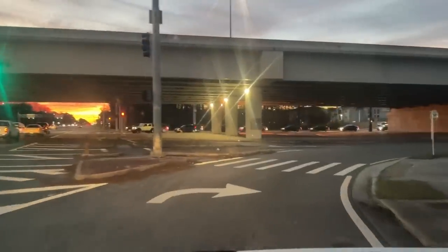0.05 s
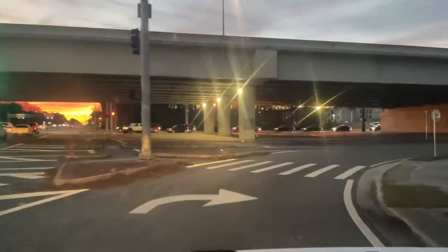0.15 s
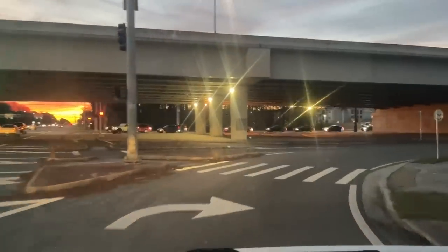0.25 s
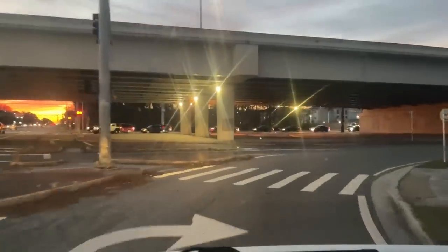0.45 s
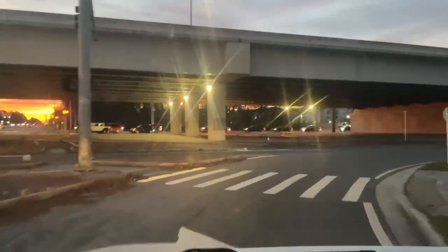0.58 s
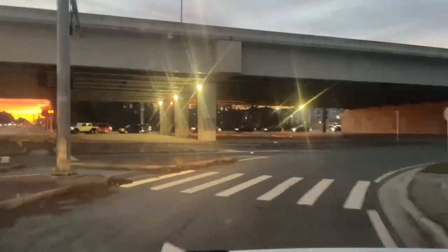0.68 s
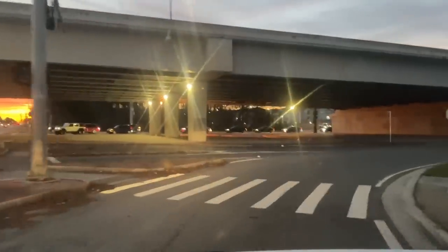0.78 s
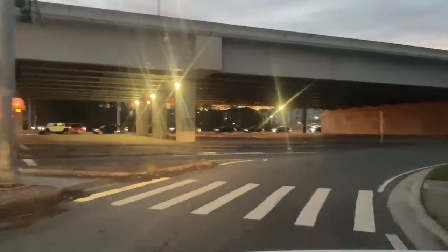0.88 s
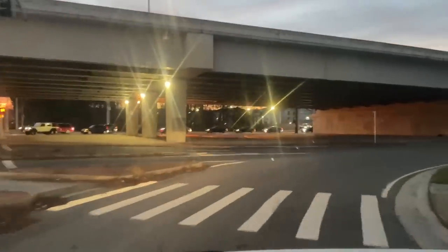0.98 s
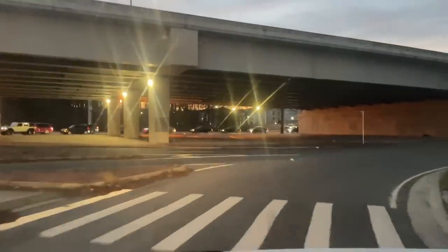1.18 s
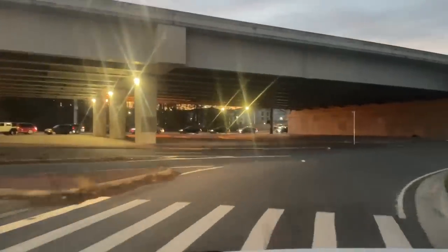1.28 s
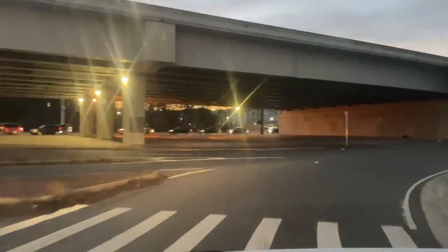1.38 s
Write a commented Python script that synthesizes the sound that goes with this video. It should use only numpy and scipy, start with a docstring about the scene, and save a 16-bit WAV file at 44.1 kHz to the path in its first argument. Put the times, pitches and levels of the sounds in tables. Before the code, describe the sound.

A van's low, uneven road rumble and faint tyre and wind hiss fill the closed cabin throughout. At 0.2 s a hard plastic clack strikes close by, bright and hollow, bouncing quickly and dying by about 0.3 s. Deep bumps boom from 0.4 to 0.65 s, with a crisp trim rattle around 0.63 to 0.7 s. Small ticks follow, another low thump lands near 1.04 s, then it settles.

```python
"""Van interior at a junction

Inside a van turning slowly, heard by a phone on the dashboard. Road roughness is filtered noise
in the body's low modes; bumps are tones that swell and ring down; tyre and wind noise is coloured noise.
A hard plastic clack close by is a run of blows on decaying modes, each with a crack of noise;
loose trim ticks are short hisses with a knock of band-limited noise."""
import sys
import numpy as np
from scipy import signal
from scipy.fft import rfft, irfft, next_fast_len
from scipy.io import wavfile
from scipy.ndimage import uniform_filter1d

SR = 44100
rng = np.random.default_rng(int(sys.argv[2]) if len(sys.argv) > 2 else 0)


def materialize(psi):
    """Save the field psi as 16-bit PCM at rate SR to the path in sys.argv[1].

    A 1-D psi becomes a single channel; in a 2-D psi each row is a channel.
    """
    bounded = np.clip(np.atleast_2d(psi).T, -1, 1)
    quanta = np.round(bounded * 32767).astype(np.int16)
    wavfile.write(sys.argv[1], SR, quanta)


N = 63945
HIT_SAMPLES = 16000  # longest that a blow or tick may last


def undb(db):
    """Decibel law: amplitude gain is ten to the power of dB over 20."""
    return 10 ** (np.asarray(db, float) / 20)


def at(table, hz):
    """Logarithmic frequency scale: interpolate (frequency, value) points along it."""
    points = np.array(table, float)
    return np.interp(np.log(np.maximum(hz, 1)), np.log(points[:, 0]), points[:, 1])


def shape(x, gain):
    """Linear filtering: multiply the spectrum by a function of frequency."""
    size = next_fast_len(N + 8192)
    hz = np.fft.rfftfreq(size, 1 / SR)
    return irfft(rfft(x, size) * gain(hz), size)[..., :N]


def pan(db):
    """Interaural level difference: split a left-over-right gap evenly between the channels."""
    return undb(np.array([[db], [-db]]) / 2)


def unit(x):
    """Root-mean-square normalisation: scale to rms 1."""
    return x / np.sqrt(np.mean(x ** 2))


def peak(hz, centre_hz, width_hz):
    """Simple resonance: complex response of one damped mode."""
    return 1 / (1 + 2j * (hz - centre_hz) / width_hz)


def walk(rate_hz):
    """Low-pass noise: a random wander of rms 1, smoothed twice over one period of the rate."""
    width = max(int(SR / rate_hz), 2)
    smooth = uniform_filter1d(rng.standard_normal(N), width, mode="wrap")
    return unit(uniform_filter1d(smooth, width, mode="wrap"))


def decay(t60):
    """Exponential damping: amplitude falls 60 dB in t60 seconds."""
    return np.exp(-np.log(1000) * np.arange(HIT_SAMPLES) / SR / max(t60, 1 / SR))


def span(start_s):
    """Finite support: the samples that a hit starting at start_s may fill."""
    first = max(int(start_s * SR), 0)
    return slice(first, min(first + HIT_SAMPLES, N))


def pair(hz_gain, likeness):
    """Partial coherence: mid and side noises share a colour and set left-right likeness by band."""
    like = lambda f: np.clip(at(likeness, f), 0, 1)
    mid = shape(rng.standard_normal(N), lambda f: hz_gain(f) * np.sqrt(1 + like(f)))
    side = shape(rng.standard_normal(N), lambda f: hz_gain(f) * np.sqrt(1 - like(f)))
    return np.array([mid + side, mid - side]) / np.sqrt(np.mean(mid ** 2))


# body and cabin modes fed by road roughness: pitch_hz, width_hz, relative level_db
BODY_MODES = [(42, 41, -52), (85, 28, -50.5), (148.8, 48, -54.5), (206.6, 41, -59), (269, 32, -65),
              (330, 28, -61.5), (682, 140, -62)]
# roughness of the road, added to mode and rumble levels: time_s, change_db
ROUGHNESS = [(0, -0.5), (.15, 2), (0.349, 0.5), (0.601, 2.5), (.8, -3), (.9, 2), (1.15, 0.5), (1.25, -2),
             (1.37, -2), (1.45, -1)]
# likeness of left and right in body and road noise: frequency_hz, likeness (0-1)
ROAD_LIKENESS = [(30, 1), (125, .9), (300, 1), (700, 1), (1400, 0), (5000, 1), (15000, 0.8)]
BODY_FLICKER_DB, BODY_FLICKER_HZ = 1, 10


def body():
    """Forced resonance: noise excites each low mode, which follows roughness and flickers alone."""
    rough_db = np.interp(np.arange(N) / SR, *np.transpose(ROUGHNESS))
    out = 0
    for hz, width_hz, db in BODY_MODES:
        level_db = db + rough_db + BODY_FLICKER_DB * walk(BODY_FLICKER_HZ)
        out = out + undb(level_db) * pair(lambda f: peak(f, hz, width_hz) ** 2, ROAD_LIKENESS)
    return out


# colour of tyre and wind noise: frequency_hz, relative density_db (per Hz)
ROAD_COLOUR = [(20, -27), (90, -9.5), (260, -20.5), (440, -23), (700, -19.5), (1260, -30.5), (1700, -33),
               (2500, -42), (5000, -48.5), (8500, -54), (12500, -47.5), (16000, -59.5)]
# relative level of the upper road bands: time_s, level_db
ROAD_HISS = [(0, -50.5), (0.072, -60.5), (0.201, -50.5), (.4, -59), (0.501, -52.5), (0.599, -54), (.7, -49),
             (.8, -55.5), (0.949, -57.5), (1.1, -52.5), (1.25, -58), (1.32, -56.5), (1.45, -60.5)]
ROAD_FLICKER_DB, ROAD_FLICKER_HZ = 1.5, 20
ROAD_GAIN_DB, RUMBLE_DB = -1, -63  # trim of all bands; rumble level before roughness and trim


def road():
    """Broadband noise: overlapping bands an octave apart swell in two groups and flicker alone."""
    t = np.arange(N) / SR
    hiss_db = np.interp(t, *np.transpose(ROAD_HISS))
    rumble_db = RUMBLE_DB + np.interp(t, *np.transpose(ROUGHNESS))
    # band sizes are relative to the 400-2500 Hz part of the colour
    scale = np.sqrt(np.sum(undb(2 * at(ROAD_COLOUR, np.arange(400, 2500)))))
    out = 0
    for centre_hz in 40 * 2. ** np.arange(9):
        def gain(f):
            octaves = np.clip(np.log2(np.maximum(f, 1) / centre_hz), -1, 1)
            return undb(at(ROAD_COLOUR, f)) * np.cos(np.pi / 2 * octaves)

        size = np.sqrt(np.sum(gain(np.arange(1, SR / 2)) ** 2)) / scale
        group_db = hiss_db if centre_hz > 200 else rumble_db
        level_db = group_db + ROAD_FLICKER_DB * walk(ROAD_FLICKER_HZ)
        out = out + size * undb(level_db) * pair(gain, ROAD_LIKENESS)
    return undb(ROAD_GAIN_DB) * out


# trim ticks, levels relative: start_s, middle_hiss_db, top_hiss_db, knock_pitch_hz, knock_db, t60_s
TRIM_TICKS = [(.002, -61, -52, 1057, -45, 0.17), (0.3108, -57.5, -52.5, 3400, -50, 0.089),
              (0.4324, -65.5, -68, 2650, -73, 0.11), (0.48, -54.5, -56.5, 2620, -63, 0.095),
              (0.507, -71, -55.5, 900, -48, 0.16), (0.6284, -47, -39.5, 6530, -46, .16),
              (0.6519, -75, -44, 4340, -40, 0.063), (.652, -62, -82, 1630, -48.5, 0.17),
              (0.661, -77.5, -83, 1080, -43, 0.13), (.672, -64, -87, 1650, -58, .15),
              (0.699, -55, -58.5, 1589, -49, 0.081), (.714, -62.5, -75, 4120, -61.5, 0.105),
              (0.8475, -53, -65, 5140, -58, 0.063), (0.914, -57.5, -66.5, 2140, -63.5, 0.16),
              (0.924, -59.5, -56, 2070, -62, 0.22), (0.935, -60.5, -64, 2850, -67, 0.21),
              (.965, -57.5, -51.5, 3280, -52, 0.19), (0.99, -59, -63, 6460, -53, 0.21),
              (1.045, -55, -59.5, 1720, -63, 0.15), (1.06, -55.5, -61.5, 611, -43.5, 0.13),
              (1.081, -60, -75, 680, -47, 0.065), (1.1276, -59, -82, 2700, -56, 0.086),
              (1.126, -73, -85, 668, -40, 0.041), (1.168, -60.5, -74, 1570, -56.5, 0.18),
              (1.193, -70, -79, 2650, -68, 0.15), (1.3077, -58.5, -47.5, 4810, -74, 0.074),
              (1.313, -72, -63, 1120, -65, .12), (1.332, -72.5, -63, 2840, -77.5, 0.44)]
# colour of the middle hiss: frequency_hz, relative level_db
TICK_MIDDLE_COLOUR = [(500, 9.5), (1200, 8), (1800, 8), (2800, 3), (4300, 3), (5300, 3), (6500, -2),
                      (8500, -6.5), (10000, -33)]
# colour of the top hiss: frequency_hz, relative level_db
TICK_TOP_COLOUR = [(6000, -10), (8500, 5.5), (11000, 7.5), (13500, 8), (16000, -5.5)]
# likeness of left and right in cracks and ticks: frequency_hz, likeness (0-1)
HIT_LIKENESS = [(500, 1), (2000, 0.6), (6000, 0.33), (12000, 1)]
KNOCK_WIDTH, TICK_RISE_S = 0.13, 0.0034  # band as a fraction of pitch; time to close 60 dB of the rise
TICK_GRAIN_DB, TICK_GRAIN_HZ, TICK_PAN_DB = 1, 496, 0.5


def ticks():
    """Impulsive excitation: a sudden grainy hiss in two bands, with a knock of narrow-band noise."""
    middle = pair(lambda f: undb(at(TICK_MIDDLE_COLOUR, f)), HIT_LIKENESS)
    top = pair(lambda f: undb(at(TICK_TOP_COLOUR, f)), HIT_LIKENESS)
    white = pair(np.ones_like, HIT_LIKENESS)
    out = np.zeros((2, N))
    for start_s, middle_db, top_db, hz, knock_db, t60 in TRIM_TICKS:
        now = span(start_s)
        edges_hz = hz * (1 + KNOCK_WIDTH) ** np.array([-.5, .5])
        band = signal.butter(2, edges_hz, "band", fs=SR, output="sos")
        knock = unit(signal.sosfilt(band, white[:, now]))
        env = (decay(t60) * (1 - decay(TICK_RISE_S)))[:knock.shape[1]]
        hiss = undb(middle_db) * middle[:, now] + undb(top_db) * top[:, now]
        out[:, now] += env * (hiss + undb(knock_db) * knock)
    return out * undb(TICK_GRAIN_DB * walk(TICK_GRAIN_HZ))


# bumps that boom a body mode: crest_s, pitch_hz, crest level_db, swell_s, nominal ring t60_s
BUMPS = [(.09, 151.7, -43, 0.035, 0.23), (.125, 94, -51.5, 0.024, 0.27), (0.229, 199, -34, 0.019, 0.12),
         (.31, 91, -44, .03, 0.11), (0.419, 84.8, -28, 0.036, 0.16), (0.467, 82, -32.5, 0.01, 0.15),
         (.5, 147, -35, 0.015, 0.14), (.512, 40.4, -20.5, 0.04, 0.16), (.5365, 78, -21.5, 0.036, 0.13),
         (0.56, 144, -24.5, 0.013, 0.1), (.604, 92.5, -24, 0.0083, 0.067), (0.608, 340, -47, 0.026, 0.24),
         (0.627, 276.7, -44.5, 0.082, 0.1), (.643, 43.2, -21, 0.021, 0.22), (0.649, 210.8, -44, .025, 0.26),
         (0.723, 86.8, -39, 0.022, .2), (.78, 44.4, -44, 0.036, 0.39), (0.782, 95.04, -38.5, 0.022, 0.067),
         (.95, 88.9, -38, 0.049, 1), (.962, 333.3, -42.5, 0.021, 0.14), (1.044, 82.7, -20, 0.03, 0.11),
         (1.069, 39, -34, 0.099, .3), (1.125, 218, -45, 0.044, 0.095), (1.16, 77.5, -48.5, 0.039, 0.36),
         (1.29, 327, -46, 0.027, 0.11), (1.33, 85, -44, 0.055, 0.18), (1.365, 269.3, -48.5, 0.04, 0.11),
         (1.38, 89.8, -40.5, 0.027, 0.11)]


def booms():
    """Transient response: a mode swells to a crest as a Gaussian, then rings down."""
    t, out = np.arange(N) / SR, np.zeros(N)
    for crest_s, hz, db, swell_s, t60 in BUMPS:
        since = t - crest_s
        swell = np.exp(-2 * (since / swell_s) ** 2)
        ring = 1 / np.cosh(since * np.log(1000) / t60)  # round at the crest, exponential later
        env = np.where(t < crest_s, swell, ring)
        out += undb(db) * env * np.cos(2 * np.pi * hz * since)
    return out


# what rings in the clack: nominal pitch_hz, relative level_db, t60_s, left_over_right_db
PLASTIC_MODES = [(434.6, -29.5, 0.033, 1.5), (561, 3, 0.049, 0), (653.7, 4.5, 0.048, 5),
                 (695.4, -6.5, 0.057, 0.5), (967, -19.5, 0.17, 2.5), (1355, -1, 0.033, 6),
                 (1579, -7, .06, 3), (2146, -5, 0.076, -0.5), (2720, -7, 0.057, -1.5), (3000, -5, 0.02, 4),
                 (3240, -2, 0.025, -1.5), (3364, -10.5, 0.045, 2.5), (3530, -3, 0.013, 1.5),
                 (4235, -5.5, 0.034, 4), (7300, -22, 0.01, 0)]
# its blows: start_s, hollow_modes_db, bright_modes_db, hollow_tilt (dB per octave about the second mode)
CLACK_BLOWS = [(.2028, -21, -15.5, 0.5), (.2048, -12, -25, -13), (.2085, -20.5, -29, -1.5),
               (.2125, -15, -26, -3.5), (.2195, -22.5, -32, -11), (.232, -28.5, -32, 0),
               (.2375, -61, -39, 4), (.241, -24.5, -39, 23.5), (.2465, -20, -36.5, 14.5),
               (.252, -38, -41, 2), (.2595, -29, -55, -1), (.2745, -31, -63, 7)]
# colour of the crack of each blow: frequency_hz, relative level_db
CRACK_COLOUR = [(1000, -31), (1400, -3), (2500, -5), (4000, -3.5), (5600, -7), (8500, -14), (11500, -3),
                (16000, -26)]
HOLLOW_BELOW_HZ = 850
HOLLOW_RISE_S, BRIGHT_RISE_S = 0.043, 0.0021  # time to close 60 dB of the rise
BRIGHT_ROUGH, BRIGHT_ROUGH_HZ = .4, 200  # depth and rate of the buzz
BRIGHT_SPREAD_DB, BRIGHT_PITCH_SPREAD = 0.68, 0.01  # random change per blow; pitch as a fraction
CRACK_DB, CRACK_T60_S = -4, 0.011  # relative to the bright modes
TAIL_DB, TAIL_T60_S, TAIL_DULL_HZ = -16, 0.11, 6200


def clack():
    """Modal impact: bouncing blows ring hollow modes that swell and bright ones that buzz, with a crack."""
    t, out = np.arange(HIT_SAMPLES) / SR, np.zeros((2, N))
    noise = pair(lambda f: undb(at(CRACK_COLOUR, f)), HIT_LIKENESS)
    dull = shape(noise, lambda f: 1 / (1 + (f / TAIL_DULL_HZ) ** 2))
    buzz = [1 + BRIGHT_ROUGH * walk(BRIGHT_ROUGH_HZ) for _ in PLASTIC_MODES]
    tilt_centre_hz = PLASTIC_MODES[1][0]
    for start_s, hollow_db, bright_db, tilt_db in CLACK_BLOWS:
        now = span(start_s)
        draws = rng.standard_normal((len(PLASTIC_MODES), 2))
        for (hz, db, t60, pan_db), rough, (level_draw, pitch_draw) in zip(PLASTIC_MODES, buzz, draws):
            if hz < HOLLOW_BELOW_HZ:
                level_db = hollow_db + db + tilt_db * np.log2(hz / tilt_centre_hz)
                ring = undb(level_db) * (1 - decay(HOLLOW_RISE_S)) * np.sin(2 * np.pi * hz * t)
            else:
                level_db = bright_db + db + BRIGHT_SPREAD_DB * level_draw
                blow_hz = hz * (1 + BRIGHT_PITCH_SPREAD * pitch_draw)
                env = undb(level_db) * (1 - decay(BRIGHT_RISE_S)) * rough[now]
                ring = env * np.sin(2 * np.pi * blow_hz * t)
            out[:, now] += ring * decay(t60) * pan(pan_db)
        crack = noise[:, now] * undb(CRACK_DB) * decay(CRACK_T60_S)
        tail = dull[:, now] * undb(TAIL_DB) * decay(TAIL_T60_S)
        out[:, now] += undb(bright_db) * (crack + tail)
    return out


# phase by which the left port leads: frequency_hz, phase_rad
PORT_LEAD = [(20, 0), (60, 0.3), (200, 0.47), (600, 1.42), (1000, 1.76), (1600, 0.43), (3200, 1.41),
             (4900, 0.82), (6400, 1.5), (8500, -3.5), (13200, -5.5), (17000, -9)]
# level of the left port over the right: frequency_hz, gap_db
PORT_LEVEL = [(20, 2), (40, 0.8), (85, 2.5), (250, 4), (1000, 1.5), (4000, 4.5), (8000, 0.5), (16000, -1)]


def scene():
    """Superposition: all sources add, then reach two ports that differ in level and phase."""
    mix = body() + road() + pan(TICK_PAN_DB) * ticks() + booms() + clack()

    def ports(f):
        log_ratio = np.log(undb(at(PORT_LEVEL, f))) + 1j * at(PORT_LEAD, f)
        return np.exp(np.array([[.5], [-.5]]) * log_ratio)  # half the gap to each side

    return shape(mix, ports)


TOP_HZ = 16300


def record(dry):
    """Band limiting: the phone cuts the top with a steep low-pass filter."""
    return signal.sosfilt(signal.ellip(10, .2, 80, TOP_HZ, fs=SR, output="sos"), dry)


dry = scene()
out = record(dry)
materialize(out)
```